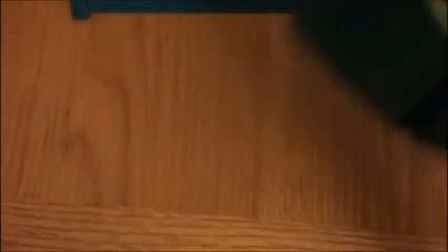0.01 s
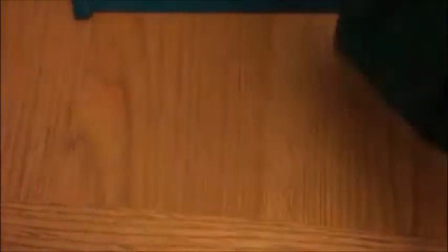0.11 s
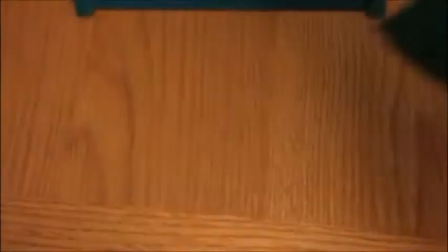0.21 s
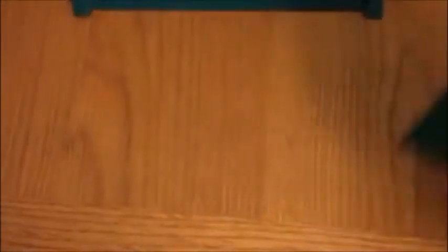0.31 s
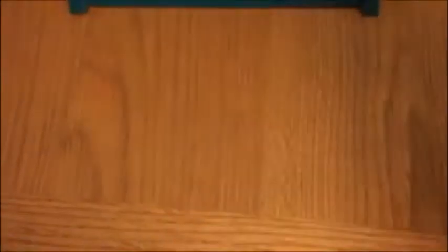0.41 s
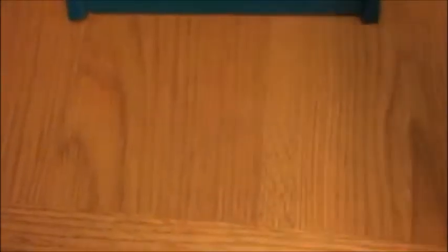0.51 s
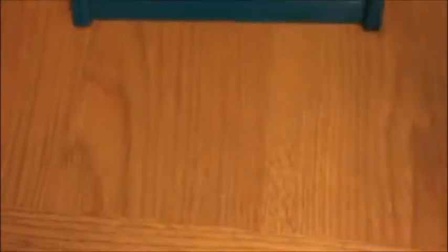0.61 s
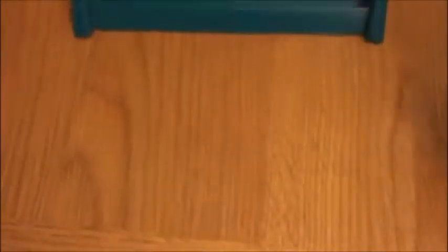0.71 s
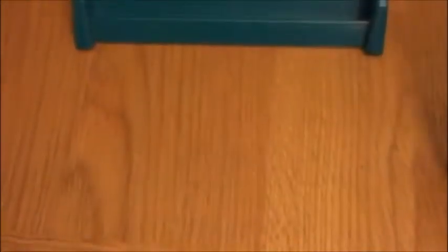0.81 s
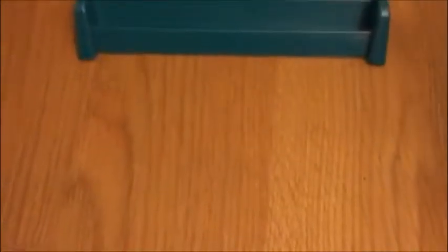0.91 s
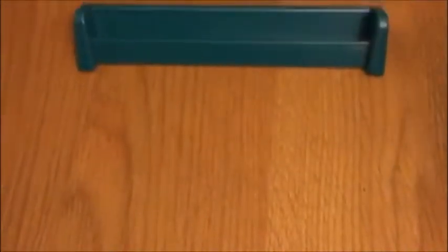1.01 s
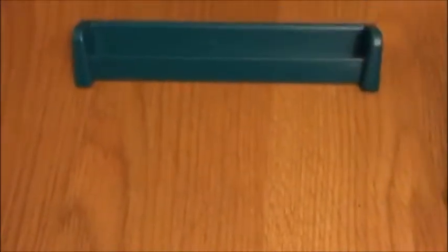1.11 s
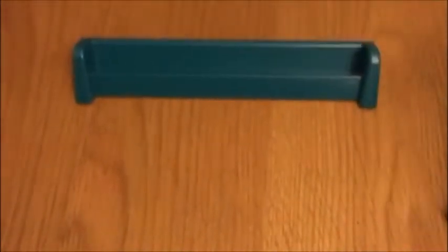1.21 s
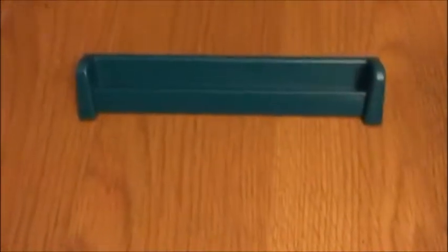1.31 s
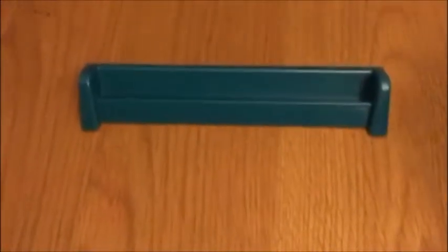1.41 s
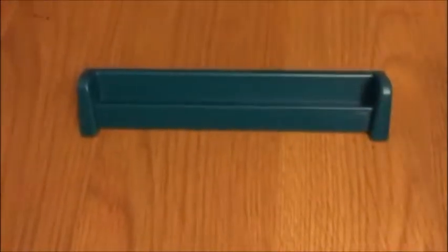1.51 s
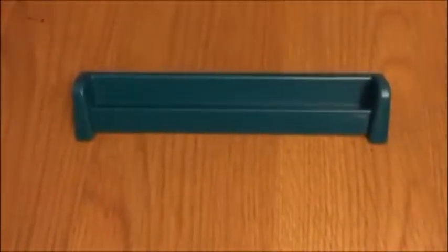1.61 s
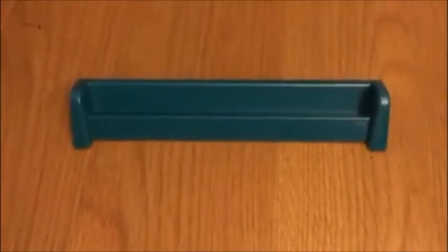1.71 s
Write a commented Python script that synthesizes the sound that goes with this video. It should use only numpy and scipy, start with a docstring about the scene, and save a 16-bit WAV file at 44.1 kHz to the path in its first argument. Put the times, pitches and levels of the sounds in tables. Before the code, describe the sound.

A cloth bag of wooden tiles is jostled in rapid bright clicks, set down, and rustles softly

```python
"""Tiles shaken in a cloth bag

Wooden game tiles are jostled in a cloth bag over a table in a small room, over quiet air.
Shakes drive a random rush of clicks with pitched partials; hard clacks, each with a rebound, stand out.
Filtered noise makes the flaps and rubbing of the cloth, damped sines the soft bumps of the bag.
One tile knocks down hard; then the cloth rustles and the tiles settle with muffled ticks."""
import sys
import numpy as np
from scipy import signal
from scipy.io import wavfile
from scipy.ndimage import uniform_filter1d

SR = 44100
rng = np.random.default_rng(int(sys.argv[2]) if len(sys.argv) > 2 else 0)


def output_pcm(signal):
    """Save a mono or channel-first signal as 16-bit PCM at the path in sys.argv[1].

    Samples are clipped to [-1, 1] before scaling.
    """
    pcm = np.clip(np.atleast_2d(signal).T, -1, 1) * 32767
    wavfile.write(sys.argv[1], SR, np.round(pcm).astype(np.int16))


N = 79380
TIME_S = np.arange(N) / SR
RING_S = TIME_S[:4096]  # time axis of one short sound

PIP_LOW_HZ, PIP_HIGH_HZ = 1955, 6640
HITS_PER_S, HIT_SPREAD_DB, EVEN_S = 2000, 3.5, 0.0037
RING_DB, PIP_DB = -7.5, -7
# Shaking of the bag: t/s, clatter level/dB, top treble lift/dB
SHAKING = [(0, -49.5, 2), (.012, -44.5, 3.5), (.025, -91, -32), (.11, -63.5, -26), (.186, -48, -20),
           (.195, -37.5, -1), (.215, -32.5, 6), (.238, -41, -22), (.252, -72, -17), (.333, -54, -19),
           (.352, -37.5, -18), (.38, -31, 7), (.404, -38.5, 1.5), (.414, -28, 2), (.431, -20.5, 4.5),
           (.452, -45, 13), (.472, -57.5, -10), (.5, -76, -9), (.55, -50.5, -5), (.563, -33, -9),
           (.574, -24.5, 1), (.617, -34, 4), (.642, -25, 0.5), (.695, -34.5, 1), (.712, -44.5, -5),
           (.745, -49.5, -7), (.808, -32.5, -6), (.836, -49, 6.5), (.91, -66, -6), (.924, -43, -10),
           (.958, -51, -15), (1.07, -77.5, -5)]
# Low, woody part of the clatter: t/s, lift/dB
WOODY_LIFT = [(.22, 7), (.37, 3), (.44, 1), (.59, -8), (.66, 0), (.86, 0.5), (.93, 6)]


def clatter(count=96):
    """Many tiles collide at random, each with its own pitch, as strongly as the bag is shaken."""
    spread = np.clip(rng.standard_normal(N), -2, 2)
    hits = (rng.random(N) < HITS_PER_S / SR) * amp(HIT_SPREAD_DB * spread)
    # even out the local energy, so that SHAKING sets the level
    window = np.exp(-.5 * ((RING_S - RING_S.mean()) / EVEN_S) ** 2)
    density = abs(signal.fftconvolve(hits ** 2, window / window.sum(), "same"))
    hits = hits / np.sqrt(density * CLICK_S * SR + 1e-6)
    hits = hits * amp(curve(SHAKING)) * rng.choice([-1, 1], N)
    tiles = []
    for hz in np.geomspace(PIP_LOW_HZ, PIP_HIGH_HZ, count):
        tiles.append(unit_click(tile(RING_DB) + amp(PIP_DB) * rng.exponential() * pip(hz)))
    which, out = rng.integers(0, count, N), np.zeros(N)
    for at in np.flatnonzero(hits):
        add(out, at / SR, hits[at] * tiles[which[at]])
    bright = brighten(out, curve(SHAKING, index=2))
    return deepen(bright, curve(WOODY_LIFT))


CLACK_RING_DB, REBOUND_S, REBOUND_DB = -9, .0011, -3.5
# Hard tile-on-tile clacks: t/s, level/dB, top treble lift/dB
HARD_CLACKS = [(.0058, -39.5, -9), (0.0237, -45, 0), (0.163, -38, -16), (0.2109, -32.5, 5.5),
               (0.2204, -26.5, 4.5), (0.319, -47.5, 11.5), (0.3560, -40, 20.5), (0.3713, -27.5, 8),
               (0.4109, -25.5, 4.5), (0.4243, -16.5, 2.5), (0.4797, -33, 2), (0.4873, -34, -3),
               (0.553, -35.5, -17), (0.5713, -27.5, -3), (0.671, -31, 5), (0.8225, -32.5, 9.5),
               (0.8282, -28, 4.5), (0.8369, -33.5, -1), (0.9176, -36, 17), (1.5337, -49, -11),
               (1.6623, -41.5, -7), (1.6672, -42.5, -5), (1.7536, -44.5, -11)]


def clacks():
    """Hard collisions that stand out of the clatter; each is followed by one quick rebound."""
    out = np.zeros(N)
    for s, db, lift_db in HARD_CLACKS:
        clack = tile(CLACK_RING_DB)
        add(clack, REBOUND_S, amp(REBOUND_DB) * tile(CLACK_RING_DB))
        add(out, s, amp(db) * brighten(unit_click(clack), lift_db))
    return out


CONTACT_S, TILE_T60_S = 0.001, .04
# Spectrum of a dry contact: f/Hz, level/dB
CONTACT_SPECTRUM = [(30, -28), (100, -13.5), (400, -15.5), (750, -18), (1100, -8), (1500, -10.5),
                    (2400, -4), (4200, 3), (6900, 1.5), (7900, -3.5), (10500, -13.5), (13500, -14),
                    (16000, -24.5)]


def tile(ring_db):
    """One collision: a dry click, and two partials that depend on how the tile is wedged."""
    ring = 0
    for pitch, strength in rng.random((2, 2)):
        ring = ring + 2 * strength ** 2 * mode(pip_hz(pitch), TILE_T60_S)
    return unit_click(burst(CONTACT_S, CONTACT_SPECTRUM) + amp(ring_db) * ring)


def mode(hz, t60_s):
    """One partial of a struck tile, dying exponentially from a random phase."""
    return np.exp(-np.log(1000) * RING_S / t60_s) * np.sin(2 * np.pi * (hz * RING_S + rng.random()))


def burst(decay_s, spectrum):
    """A short coloured crack: decaying noise through a filter."""
    noise = rng.standard_normal(len(RING_S)) * np.exp(-RING_S / decay_s)
    return unit_click(colour(noise, spectrum))


PIP_DECAY_S = 0.00023


def pip(hz):
    """A few cycles of a tile damped by its neighbours and the cloth."""
    u = RING_S / PIP_DECAY_S
    return unit_click(u ** 2 * np.exp(-u) * np.sin(2 * np.pi * hz * RING_S))


def pip_hz(pitch):
    """Maps 0..1 to a tile pitch on a log axis."""
    return PIP_LOW_HZ * (PIP_HIGH_HZ / PIP_LOW_HZ) ** pitch


TONE_S = .032
# Brief steady tones near the loudest rushes: t/s, level/dB, f/Hz
SHORT_TONES = [(.44, -26.5, 1865), (.437, -17.5, 5400), (.44, -23, 4100), (.587, -24, 4700),
               (.694, -28, 2500), (.69, -27, 6150)]


def short_tones():
    """Brief steady tones near the loudest rushes, each faded out by a cosine."""
    out = np.zeros(N)
    fade = np.cos(np.pi / 2 * np.minimum(RING_S / TONE_S, 1))
    for s, db, hz in SHORT_TONES:
        add(out, s, amp(db) * unit_click(fade * np.sin(2 * np.pi * hz * RING_S)))
    return out


KNOCK_SCRAPE_S, KNOCK_SCRAPE_DB = 0.016, 0.5
# Knocks of the load against the table: t/s, level/dB
TABLE_KNOCKS = [(0.9191, -31.5), (1.624, -44.5)]
# Spectrum of a knock: f/Hz, level/dB
KNOCK_SPECTRUM = [(40, -20), (380, 1), (640, -9), (980, -1), (1500, -6), (3200, -4), (8000, -28)]


def knocks():
    """Woody blows on the table, each a filtered impulse, that scrape to rest as decaying noise."""
    out = np.zeros(N)
    blow = unit_click(colour(signal.unit_impulse(len(RING_S)), KNOCK_SPECTRUM))
    for s, db in TABLE_KNOCKS:
        scrape = burst(KNOCK_SCRAPE_S, KNOCK_SPECTRUM)
        add(out, s, amp(db) * (blow + amp(KNOCK_SCRAPE_DB) * scrape))
    return out


BUMP_S, BUMP_SNAP = 0.0036, 0.42
# Soft bumps of the bag: t/s, level/dB, f/Hz
BAG_BUMPS = [(.222, -42.5, 252), (0.419, -36.5, 167), (0.461, -44, 100), (.69, -40, 195),
             (1.2137, -44.5, 143), (1.2336, -48, 195)]


def bumps():
    """Dull bumps of the bag: a heavily damped low sine with a faint tap."""
    out, u = np.zeros(N), RING_S / BUMP_S
    for s, db, hz in BAG_BUMPS:
        push = u * np.exp(1 - u) * np.sin(2 * np.pi * hz * RING_S)
        add(out, s, amp(db) * (push + BUMP_SNAP * burst(CONTACT_S, KNOCK_SPECTRUM)))
    return out


TICK_SNAP = 0.44
# Ticks of tiles muffled by cloth: t/s, level/dB, f/Hz
MUFFLED_TICKS = [(0.0364, -45, 4170), (.8918, -41, 4740), (0.9872, -43.5, 3080), (1.154, -38.5, 3310),
                 (1.183, -49.5, 3930), (1.245, -51.5, 3860), (1.327, -46, 3120), (1.333, -42.5, 3800),
                 (1.3742, -39.5, 4400), (1.4219, -55, 2215), (1.5552, -42.5, 3930), (1.5723, -41.5, 3920),
                 (1.579, -43.5, 4100), (1.617, -42.5, 3900), (1.62, -43.5, 3580), (1.692, -46.5, 2290)]


def ticks():
    """Tiles slip against each other inside folds of cloth: a pip with a dry snap."""
    out = np.zeros(N)
    for s, db, hz in MUFFLED_TICKS:
        add(out, s, amp(db) * (pip(hz) + TICK_SNAP * burst(CONTACT_S, CONTACT_SPECTRUM)))
    return out


THUD_DB, THUD_FOLLOW_DB_PER_DB = -36, 0.59
# Spectrum of the flapping cloth: f/Hz, level/dB
FLAP_SPECTRUM = [(22, -38), (45, -15.5), (80, 2), (120, -3.5), (190, -2.5), (300, -14.5), (900, -27)]


def flaps():
    """The cloth flaps with each shake: low noise that follows part of the clatter level."""
    flap = evened(colour(rng.standard_normal(N), FLAP_SPECTRUM))
    return flap * amp(THUD_DB + THUD_FOLLOW_DB_PER_DB * curve(SHAKING))


FIBRE_S, FIBRE_SPREAD_DB = .001, 5
# Rubbing of the cloth: t/s, level/dB
RUBBING = [(0, -55.5), (.07, -65.5), (.14, -56.5), (.3, -66.5), (.97, -58.5), (1.12, -72), (1.18, -56),
           (1.25, -57), (1.3, -65), (1.34, -56), (1.41, -76.5), (1.49, -72.5), (1.58, -51.5), (1.66, -57),
           (1.8, -58)]
# Spectrum of the rubbing: f/Hz, level/dB
CLOTH_SPECTRUM = [(35, -18.5), (130, 2.5), (260, 3), (600, -10), (1100, -2.5), (2200, 2), (4000, -3.5),
                  (6900, -11), (8000, -19), (16000, -34.5)]


def rubbing():
    """The cloth rubs with a fine uneven grain: noise whose strength varies at random."""
    grip = evened(uniform_filter1d(rng.standard_normal(N), size=round(FIBRE_S * SR)))
    slips = rng.standard_normal(N) * amp(FIBRE_SPREAD_DB * grip)
    return evened(colour(slips, CLOTH_SPECTRUM)) * amp(curve(RUBBING))


NUDGES_PER_S, NUDGE_DB = 300, -6  # dB re rubbing level


def nudges():
    """While the cloth rubs, tiles nudge each other with faint stray ticks."""
    out, level_db = np.zeros(N), curve(RUBBING)
    chance, pitch, strength = rng.random((3, N))
    for at in np.flatnonzero(chance < NUDGES_PER_S / SR):
        gain = amp(level_db[at] + NUDGE_DB) * 2 * strength[at] ** 2
        add(out, at / SR, gain * pip(pip_hz(pitch[at])))
    return out


ROOM_DB, ECHO_S, ECHO_DB = -12, .003, -15.5
# Decay of the room: f/Hz, T60/s
ROOM_DECAY = [(200, 0.24), (3700, 0.2), (12000, 0.16)]


def room(x):
    """A quick echo off the table, and the short tail of the room: sparse noise decaying per band."""
    taps = rng.standard_normal(SR // 2) * (rng.random(SR // 2) < .12)
    hz, t, bands = signal.stft(taps, SR, nperseg=256)
    decay = np.exp(-np.log(1000) * t / read(ROOM_DECAY, hz)[:, None])
    tail = signal.istft(bands * decay, SR, nperseg=256)[1]
    response = np.zeros(SR // 2)
    response[0] = 1
    add(response, ECHO_S, amp([ECHO_DB]))
    add(response, ECHO_S, amp(ROOM_DB) * tail / np.linalg.norm(tail))
    return signal.fftconvolve(x, response)[:N]


AIR_DB = -68
# Spectrum of the quiet air: f/Hz, level/dB
AIR_SPECTRUM = [(20, -16.5), (75, 7.5), (250, 1.5), (600, -6.5), (2000, -6), (9000, -37.5)]


def air():
    """Quiet air: steady coloured noise."""
    return amp(AIR_DB) * evened(colour(rng.standard_normal(N), AIR_SPECTRUM))


def amp(db):
    """Decibels to gain."""
    return 10 ** (np.asarray(db) / 20)


def evened(x):
    """Scales to rms 1."""
    return x / np.sqrt(np.mean(x ** 2) + 1e-20)


CLICK_S = .002


def unit_click(x):
    """Scales to the energy of a full-level burst lasting CLICK_S."""
    return x * np.sqrt(CLICK_S * SR / np.sum(x ** 2))


def read(points, hz):
    """Reads a table on a log-frequency axis."""
    f, value = np.transpose(points)
    return np.interp(np.log(hz + 1), np.log(f), value)


def curve(rows, index=1):
    """Reads one column of a table over time."""
    columns = np.transpose(rows)
    return np.interp(TIME_S, columns[0], columns[index])


def add(mix, s, sound):
    """Mixes a sound in at a time."""
    part = mix[max(round(s * SR), 0):][:len(sound)]
    part += sound[:len(part)]


def colour(x, spectrum):
    """Causal minimum-phase filter with the given spectrum."""
    log_gain = np.log(amp(read(spectrum, abs(np.fft.fftfreq(4096, 1 / SR)))))
    taps = np.fft.ifft(np.exp(np.conj(signal.hilbert(log_gain)))).real
    return signal.fftconvolve(x, taps[:2048])[:len(x)]


TREBLE_HZ, BODY_HZ = 7280, 3430


def brighten(x, lift_db):
    """Scales the top treble above TREBLE_HZ by the given lift."""
    high_pass = signal.butter(2, TREBLE_HZ, "high", fs=SR, output="sos")
    top = signal.sosfiltfilt(high_pass, x, padtype=None)
    return x + (amp(lift_db) - 1) * top


def deepen(x, lift_db):
    """Raises or lowers the woody part of the sound below BODY_HZ."""
    low_pass = signal.butter(2, BODY_HZ, fs=SR, output="sos")
    low = signal.sosfiltfilt(low_pass, x, padtype=None)
    return x + (amp(lift_db) - 1) * low


def scene():
    """Tiles and bag in the room, over quiet air."""
    tiles = clatter() + clacks() + ticks() + nudges()
    bag = knocks() + bumps() + flaps() + rubbing()
    return (room(tiles + short_tones() + bag) + air())[None]


EDGE_HZ = 16200
# Narrow resonances of the microphone's housing: f/Hz, width/Hz, lift/dB
HOUSING_RINGS = [(7054, 96, 8.5), (12240, 342, 15.5)]


def record(dry):
    """The microphone's housing resonates high up; then the recorder's band limit, a low-pass."""
    for hz, width_hz, lift_db in HOUSING_RINGS:
        b, a = signal.iirpeak(hz, hz / width_hz, fs=SR)
        dry = dry + (amp(lift_db) - 1) * signal.lfilter(b, a, dry)
    low_pass = signal.firwin(255, EDGE_HZ, window=("kaiser", 9), fs=SR)
    return signal.oaconvolve(dry, low_pass[None], "same")


dry = scene()
out = record(dry)
output_pcm(out)
```